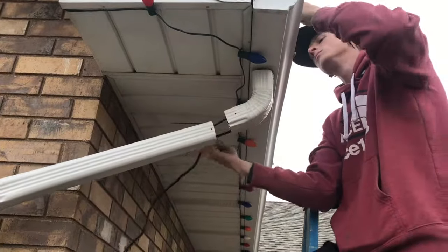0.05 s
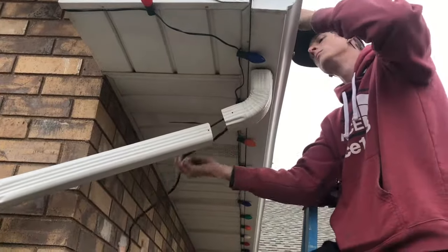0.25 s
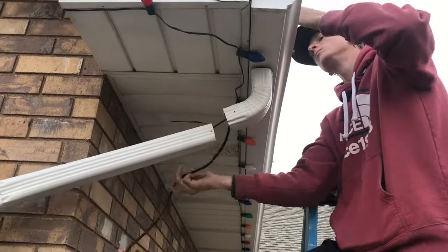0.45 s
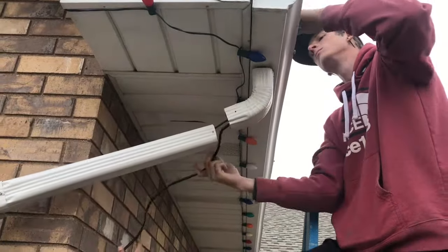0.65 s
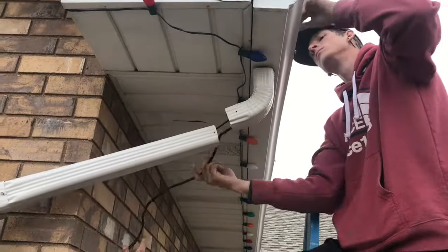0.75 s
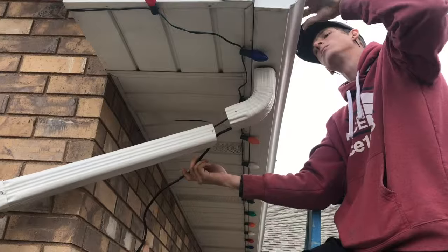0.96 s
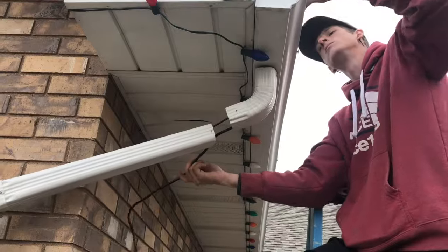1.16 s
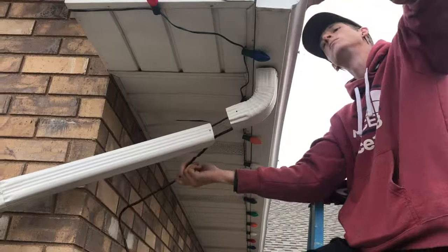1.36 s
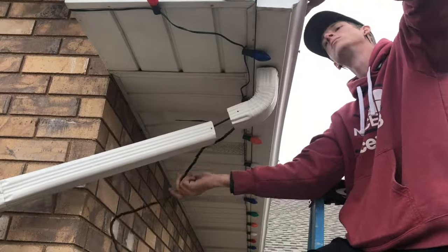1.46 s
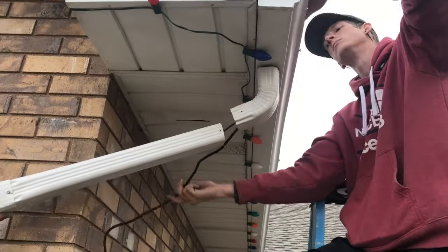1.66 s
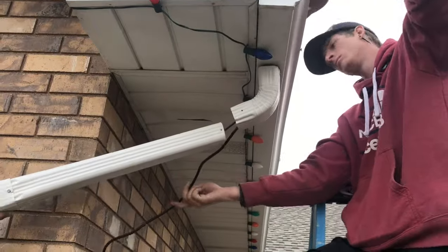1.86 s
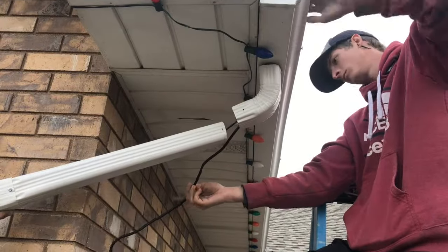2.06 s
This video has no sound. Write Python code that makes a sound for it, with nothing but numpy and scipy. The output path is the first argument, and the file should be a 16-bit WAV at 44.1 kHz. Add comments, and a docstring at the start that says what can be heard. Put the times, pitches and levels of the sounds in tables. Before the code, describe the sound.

A cable scrapes and knocks inside a thin metal downspout. Sharp clacks, hissing rubs and tiny ticks cluster from 0.2 to 0.5 seconds, and more clacks come around 0.85. After a quieter moment, duller, hollow knocks sound from about 1.25, leading into the strongest rasp near 1.5. A faint scrape and knock follow around 1.9. Each contact rings briefly in the pipe, over quiet outdoor air.

```python
"""A cable, fed by hand through a thin metal downspout beside a house, slides in short strokes.
Stick-slip friction makes it rasp and hiss. It clacks against the wall near the mouth, knocks more dully
deeper in, and grit ticks on the rim. Each contact excites the crowded bending modes of the sheet metal
in a dense, quickly dying clatter; the pipe's standing waves ring on a little, over quiet outdoor air."""
import sys
import numpy as np
from scipy import signal
from scipy.fft import rfft, irfft
from scipy.io import wavfile

SR = 44100
rng = np.random.default_rng(int(sys.argv[2]) if len(sys.argv) > 2 else 0)


def wav_record(signal):
    """Record a signal, one row per channel, as 16-bit PCM in the file named by sys.argv[1]."""
    frames = np.transpose(np.atleast_2d(signal))
    bounded = np.clip(frames, -1, 1)
    # unit amplitude maps onto the largest positive 16-bit level
    quanta = np.round(bounded * 32767).astype(np.int16)
    wavfile.write(sys.argv[1], SR, quanta)


N = 92610
TIME, RING_TIME = np.arange(N) / SR, np.arange(int(.6 * SR)) / SR

# Spectra of the rasp and the hiss. Each row: frequency in Hz, spectral density in dB.
RASP_SPECTRUM = [(130, -9), (230, -4.5), (310, -18), (450, -9), (750, 0.5), (1100, -9.5), (1900, -7),
                 (2600, -28), (4000, -38.5), (15000, -40)]
HISS_SPECTRUM = [(130, -7.5), (1500, 0.5), (3300, -7), (6000, 2), (8500, -2), (11000, -9.5), (15500, -18)]
# Strokes of the cable. Each row: peak time, swell width and fade width in seconds, rasp level and
# hiss level in dB, note of the rubbed panel in Hz.
STROKES = [(0.012, 0.11, 0.034, -84, -70, 594), (0.185, 0.026, 0.031, -80, -64.5, 670),
           (.27, 0.024, 0.047, -58, -56.5, 370), (0.342, 0.014, 0.015, -54, -44.5, 716),
           (0.402, 0.012, 0.006, -48.5, -48, 744), (.45, 0.0086, 0.17, -60.5, -67.5, 778),
           (0.642, 0.012, 0.012, -51, -56.5, 644), (.685, .012, .02, -60, -64, 624),
           (.814, 0.025, 0.0087, -61.5, -64, 750), (.872, 0.0092, 0.025, -49.5, -71, 993),
           (1.04, 0.083, 0.022, -68, -79, 1250), (1.317, 0.022, 0.013, -52.5, -62, 445),
           (1.345, 0.027, 0.025, -53.5, -70.5, 356), (1.438, 0.0067, 0.013, -46, -64, 924),
           (1.478, .014, 0.015, -37.5, -43, 1118), (1.51, 0.018, 0.028, -43, -49.5, 686),
           (1.562, 0.019, 0.014, -47.5, -48.5, 628), (1.623, 0.012, 0.01, -51, -95, 780),
           (1.71, 0.046, 0.087, -68, -78, 703), (1.88, 0.012, 0.013, -55.5, -77, 780),
           (2.019, 0.036, 0.05, -69, -79, 1480)]


def sliding_cable(bank):
    """Stick-slip friction: coarse slips rasp and ring a new panel on each stroke; fine grit hisses."""
    out = np.zeros(N)
    for peak_s, swell_s, fade_s, rasp_db, hiss_db, note_hz in STROKES:
        stroke = np.exp(-.5 * ((TIME - peak_s) / np.where(TIME < peak_s, swell_s, fade_s)) ** 2)
        rasp = friction(bank, stroke, RASP_SPECTRUM, slips_per_s=750, spread_db=4, t60_s=.06)
        note = from_db(6.5) * resonate(rasp, note_hz, t60_s=.045)
        overtone = from_db(5.5) * resonate(rasp, 1.95 * note_hz, t60_s=.045)
        hiss = friction(bank, stroke, HISS_SPECTRUM, slips_per_s=1900, spread_db=3, t60_s=.012)
        rub = from_db(rasp_db) * unit_rms(rasp + note + overtone) + from_db(hiss_db) * unit_rms(hiss)
        out += stroke.std() * rub
    return out


def friction(bank, stroke, spectrum, slips_per_s, spread_db, t60_s):
    """Superposition: random slips, scaled by the stroke, each launch the wall's impulse response."""
    sizes = from_db(spread_db * np.minimum(rng.exponential(1, N), 3)) * rng.choice([-1, 1], N)
    slips = unit_rms(sizes * (rng.random(N) < slips_per_s / SR)) * stroke
    response = wall_response(bank, spectrum, rise_s=.00016, t60_s=t60_s)
    return signal.fftconvolve(slips, response / np.linalg.norm(response))[:N]


# Spectra of the clacks and the knocks. Each row: frequency in Hz, spectral density in dB.
CLACK_SPECTRUM = [(130, -47), (300, -8.5), (500, -13), (700, 8.5), (1050, -34.5), (1400, -4.5),
                  (2000, -10.5), (3600, -17.5), (6500, -9), (9000, -17.5), (15000, -30)]
KNOCK_SPECTRUM = [(130, -32), (520, -6), (1100, -7.5), (1900, -11.5), (2700, -31), (6000, -31),
                  (15000, -43)]
# Blows on the wall. Each row: start in seconds, level in dB, extra bass, upper mids and treble in dB,
# top octave against the treble in dB, clatter T60 in seconds, panel note in Hz.
MOUTH_CLACKS = [(.2112, -36, -1.5, 3.5, -1, -8.5, 0.062, 620), (.2772, -44.5, 8.5, 2, 1, -3, 0.057, 718),
                (.3525, -41.5, 14, 3, 9, -15, 0.028, 676), (.3680, -28, -19, 8.5, 5, 2.5, 0.053, 690),
                (.3762, -39, -10, 7, 11, -25, 0.028, 772), (.5262, -42.5, 2.5, 4.5, -12, -10, 0.048, 746),
                (.8225, -41.5, -8, 6, 7, -3, 0.05, 654), (.8312, -35.5, 3.5, 6.5, 5.5, -4, 0.03, 738),
                (.9003, -39.5, -1, 5.5, -24, -4, 0.027, 635), (.9118, -46, -23, -12, -18, -4, 0.021, 768)]
DEEP_KNOCKS = [(.4090, -40.5, -1, 6.5, 11, -11, 0.065, 1402), (0.8576, -38, -2, 8, 5.5, -2, .085, 873),
               (1.062, -54, 3.5, -4, 4, 4.5, 0.14, 694), (1.2518, -49, 9, -4.5, -6, -5, 0.11, 515),
               (1.3908, -35, 4.5, -8, -6.5, 0, 0.037, 575), (1.4740, -40.5, 8, 12.5, -20, 5, 0.096, 880),
               (1.867, -54, 1, -4, 9.5, -6, 0.065, 1270)]


def cable_impacts(bank):
    """Impact excitation: sharp clacks near the mouth; duller knocks, slower to rise, deeper in."""
    clacks = blows(bank, MOUTH_CLACKS, CLACK_SPECTRUM, rise_s=.00075)
    knocks = blows(bank, DEEP_KNOCKS, KNOCK_SPECTRUM, rise_s=.0017)
    return clacks + knocks


def blows(bank, rows, spectrum, rise_s, note_db=2.5, note_t60_s=.052):
    """Free vibration: each blow sets off a clatter and the struck panel's own damped note."""
    out = np.zeros(N)
    attack = 1 - np.exp(-RING_TIME / rise_s)
    for start_s, level_db, bass_db, mid_db, treble_db, top_db, t60_s, note_hz in rows:
        clatter = wall_response(bank, spectrum, rise_s, t60_s, bass_db, mid_db, treble_db, top_db)
        note = np.sin(2 * np.pi * note_hz * RING_TIME) * decay(note_t60_s) * attack
        add(out, start_s, from_db(level_db) * (clatter + from_db(note_db) * note))
    return out


# Spectrum of a tick. Each row: frequency in Hz, spectral density in dB.
TICK_SPECTRUM = [(3000, -14), (6000, 3), (10000, 3), (15000, -2)]
# Grit catching on the rim. Each row: start in seconds, level in dB.
RIM_TICKS = [(.3258, -59), (.3397, -61), (0.457, -51), (0.475, -51.5), (0.515, -60), (.7605, -68),
             (0.779, -59.5)]


def grit_ticks(bank):
    """Very brief contacts excite mainly the high modes, so grit gives tiny, bright ticks."""
    out = np.zeros(N)
    for start_s, level_db in RIM_TICKS:
        tick = wall_response(bank, TICK_SPECTRUM, rise_s=.00021, t60_s=.021)
        add(out, start_s, from_db(level_db) * tick)
    return out


BAND_EDGES_HZ = np.geomspace(110, 17000, 26)


def crowded_modes():
    """Modal overlap: wall modes too close to resolve act as noise in roughly third-octave bands."""
    white = rng.standard_normal((3, N))
    return np.array([signal.sosfilt(signal.butter(2, band, "band", fs=SR, output="sos"), white[k % 3])
                     for k, band in enumerate(zip(BAND_EDGES_HZ, BAND_EDGES_HZ[1:]))])


# Damping of the wall's late ring. Each row: frequency in Hz, T60 in seconds.
LATE_RING_T60 = [(150, 1), (550, 0.28), (1400, 0.23), (3700, 0.26), (10000, 0.17)]
# Strength of that ring. Each row: frequency in Hz, level against the clatter in dB.
LATE_RING_DB = [(150, -15.5), (700, -6.5), (1600, -13), (4000, -22), (12000, -14.5)]


def wall_response(bank, spectrum, rise_s, t60_s, bass_db=0, mid_db=0, treble_db=0, top_db=0):
    """Double-slope decay: a touch at a new spot gives each band a fast clatter and a weaker, long ring."""
    hz = np.sqrt(BAND_EDGES_HZ[1:] * BAND_EDGES_HZ[:-1])[:, None]
    gain = from_db(at_hz(spectrum, hz)) * np.sqrt(hz)  # wider bands hold more power
    spot_tone = [(374, bass_db), (785, 0), (1640, mid_db), (5500, treble_db), (12000, treble_db + top_db)]
    gain = gain / np.linalg.norm(gain) * from_db(at_hz(spot_tone, hz))
    ring = from_db(at_hz(LATE_RING_DB, hz)) * decay(at_hz(LATE_RING_T60, hz))
    envelope = np.hypot(decay(t60_s), ring) * (1 - np.exp(-RING_TIME / rise_s))
    length = len(RING_TIME)
    start = rng.integers(length, N - length)
    modes = unit_rms(bank[:, start:start + length] * envelope) * envelope.std(axis=1, keepdims=True)
    return fold_echoes(np.sum(gain * modes, axis=0))


def fold_echoes(x, reflection=.4, typical_lag_s=.0016):
    """Comb filtering: bending waves bounce between the sheet's folds, giving each spot metallic lines."""
    lag_s = typical_lag_s * 2 ** rng.uniform(-.999, 1)
    delay = np.exp(-2j * np.pi * np.fft.rfftfreq(len(x), 1 / SR) * lag_s)
    round_trip = rng.choice([-1, 1]) * reflection * delay
    return unit_rms(irfft(rfft(x) / (1 - round_trip), len(x))) * x.std()


# Resonances of the pipe. Each row: frequency in Hz, gain in dB with the cable shallow, gain in dB with
# it deep, T60 in seconds.
STANDING_WAVES = [(240, -3, 11, .3), (430, -4, 7, .22), (670, -14, -1, .25), (865, -6, 1.5, .3),
                  (1033, -8, 0, .25), (1339, 4, -6, .3), (1494, 3, -4, .3), (1715, -10, 5, .11),
                  (1878, 1, -8, .2), (2191, 6, -6, .14), (3062, 0, -3, .14), (4121, 0, 0, .12),
                  (4411, 2, 2, .14), (6637, -2, -4, .1)]


def downspout(contacts, bass_cut_hz=150, going_deeper_s=(.95, 1.25)):
    """Standing waves colour the contacts; the low ones are driven harder once the cable is deeper."""
    # a high-pass keeps deep bass out of the contacts
    direct = signal.sosfilt(signal.butter(3, bass_cut_hz, "high", fs=SR, output="sos"), contacts)
    out = direct
    for hz, shallow_db, deep_db, t60_s in STANDING_WAVES:
        coupling = from_db(np.interp(TIME, going_deeper_s, [shallow_db, deep_db]))
        out = out + resonate(coupling * direct, hz, t60_s)
    return out


# Spectrum of the outdoor air. Each row: frequency in Hz, spectral density in dB.
AIR_SPECTRUM = [(20, -1), (150, 4.5), (700, 0), (1400, -8.5), (3000, -18.5), (15000, -19)]


def outdoor_air(level_db=-68.5):
    """Stationary noise, strongest at low frequencies, forms a quiet background."""
    hz = np.maximum(np.fft.rfftfreq(N, 1 / SR), 1)
    spectrum = rfft(rng.standard_normal(N)) * from_db(at_hz(AIR_SPECTRUM, hz))
    return from_db(level_db) * unit_rms(irfft(spectrum, N))


def resonate(x, hz, t60_s):
    """Forced vibration of one damped mode, with unit gain at resonance."""
    r = np.exp(-np.log(1000) / (t60_s * SR))
    feedback = [1, -2 * r * np.cos(2 * np.pi * hz / SR), r * r]
    return (1 - r * r) / 2 * signal.lfilter([1, 0, -1], feedback, x + 1e-18)


def decay(t60_s):
    """Exponential damping: a fall of 60 dB in t60_s."""
    return np.exp(-np.log(1000) * RING_TIME / t60_s)


def from_db(db):
    """Decibels to amplitude ratio."""
    return 10 ** (np.asarray(db) / 20)


def unit_rms(x):
    """Normalisation to unit rms along time."""
    return x / np.sqrt(np.mean(x ** 2, axis=-1, keepdims=True) + 1e-20)


def at_hz(points, hz):
    """Interpolation on a log-frequency axis."""
    point_hz, value = np.transpose(points)
    return np.interp(np.log(hz), np.log(point_hz), value)


def add(out, start_s, sound):
    """Superposition of a sound from start_s on."""
    part = out[int(start_s * SR):][:len(sound)]
    part += sound[:len(part)]


def scene():
    """Source and filter: impacts, ticks and strokes sound through the pipe, over the outdoor air."""
    bank = crowded_modes()
    contacts = cable_impacts(bank) + grit_ticks(bank) + sliding_cable(bank)
    return (downspout(contacts) + outdoor_air())[None]


def record(dry):
    """Band limiting: a steep low-pass removes the treble above 15.9 kHz."""
    return signal.sosfilt(signal.ellip(10, .1, 70, 15900, fs=SR, output="sos"), dry)


dry = scene()
out = record(dry)
wav_record(out)
```